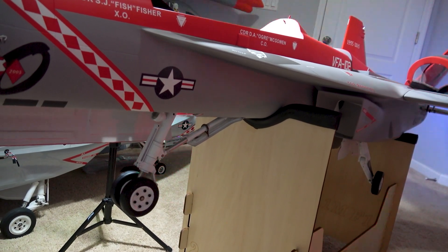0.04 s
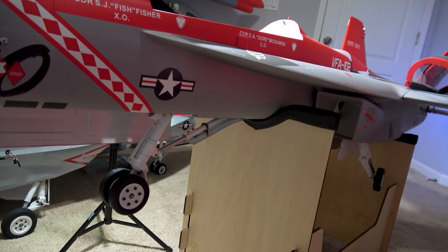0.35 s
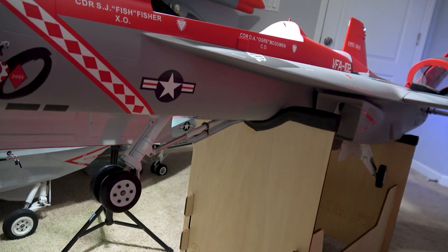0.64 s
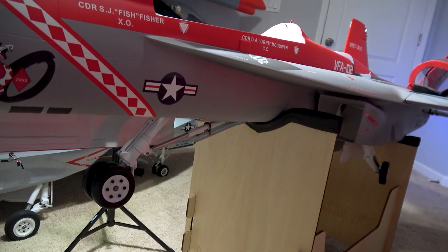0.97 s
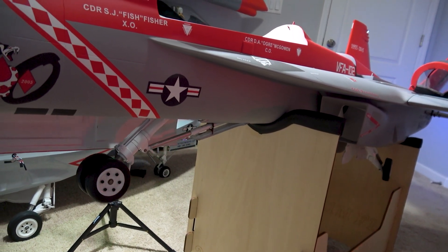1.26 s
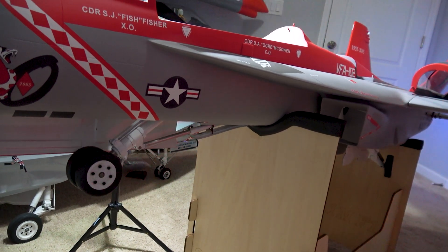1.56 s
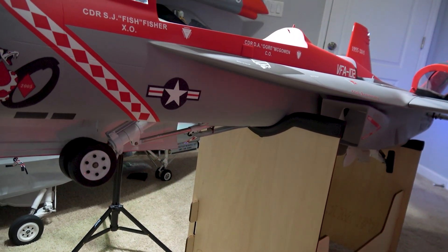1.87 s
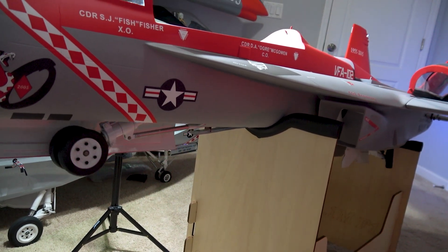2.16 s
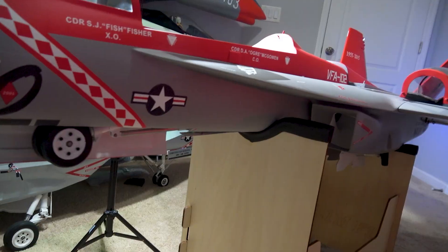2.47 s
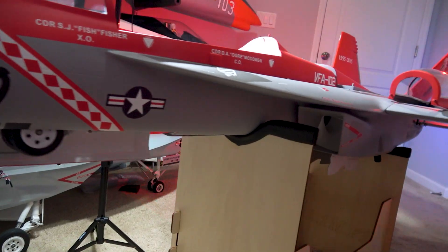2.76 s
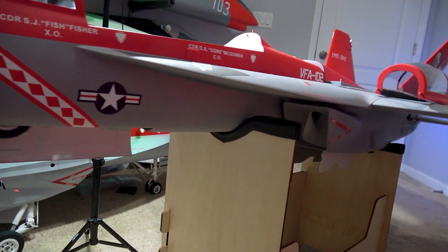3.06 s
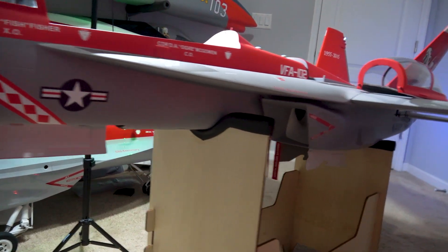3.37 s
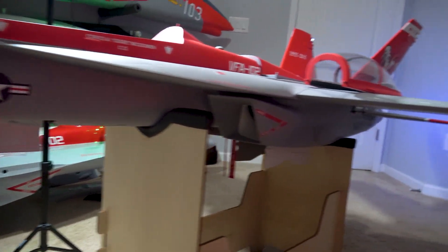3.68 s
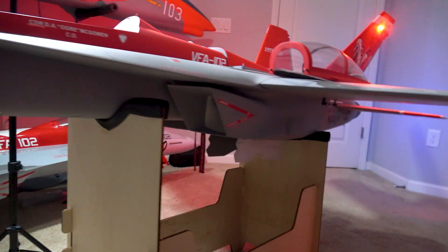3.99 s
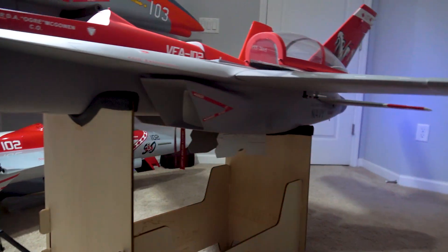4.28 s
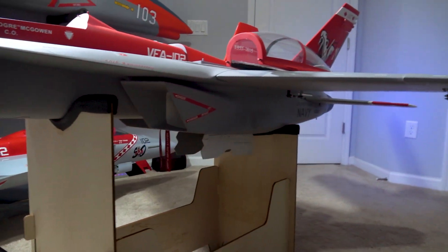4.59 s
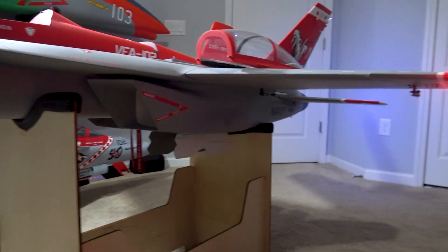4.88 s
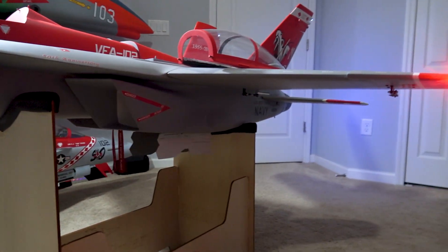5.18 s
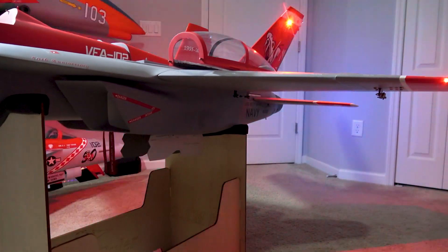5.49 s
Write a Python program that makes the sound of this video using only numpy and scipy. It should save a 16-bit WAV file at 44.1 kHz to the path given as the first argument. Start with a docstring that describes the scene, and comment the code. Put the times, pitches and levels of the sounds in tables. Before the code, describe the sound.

Small electric motors whine and rattle as a model jet's landing gear folds up, stopping abruptly before the doors shut with two light clacks.

```python
"""A rattling, geared whine: three electric retracts fold a large model jet's landing gear.
In the small carpeted room their motors run at nearly the same speed, brushes buzzing, and loose
teeth shake the hollow airframe. Each motor sags and squeals under load, then stalls at its end stop.
Last, small servos pull the gear doors shut with two light clacks."""
import sys
import numpy as np
from scipy import signal
from scipy.fft import rfft, irfft, next_fast_len
from scipy.io import wavfile

SR = 44100
rng = np.random.default_rng(int(sys.argv[2]) if len(sys.argv) > 2 else 0)


def dump(signal):
    """Clip the signal to [-1, 1] and save it as 16-bit WAV at the path in sys.argv[1]."""
    limited = np.clip(np.atleast_2d(signal).T, -1, 1)
    pcm = np.round(limited * 32767).astype(np.int16)
    wavfile.write(sys.argv[1], SR, pcm)


N = 244225
TIME = np.arange(N) / SR
PINION_TEETH = 6
IDLER_RATIO = .787  # idler turns per shaft turn
SCREW_REDUCTION, STAGE_REDUCTION = 47, 7.55  # shaft turns per turn of each slow gear
FULL_LOAD_SAG = .048  # share of its starting speed a motor has lost at full load
SING_HZ, RING_HZ = 3100, 3603
ROOM_T60_S = .32

# each motor's run, ending where it stalls (time [s], shaft speed [turns/s])
NEAR_SPEED = [(0, 353), (.6, 355), (1.2, 354.5), (1.7, 352), (2.15, 351.5), (2.45, 349.5), (2.7, 343.5),
              (3.0, 346), (3.2, 347.5), (3.55, 352.5), (3.87, 354.5), (3.96, 343), (4.04, 336), (4.07, 305)]
FAR_SPEED = [(0, 349.5), (.6, 349), (1.2, 347.5), (1.7, 346), (2.2, 343), (2.5, 337), (2.75, 333),
             (3.0, 338), (3.3, 342), (3.5, 350), (3.85, 354), (3.94, 322), (3.98, 317), (4.01, 323),
             (4.05, 317), (4.075, 299), (4.16, 293)]
NOSE_SPEED = [(0, 351), (.5, 354), (1.1, 358), (1.6, 355), (2.0, 351), (2.4, 349), (2.55, 341),
              (2.585, 335), (2.6, 311), (2.617, 290), (2.64, 307), (2.655, 285), (2.68, 298)]
# each motor's voice (pitch [x shaft speed], level [dB])
NEAR_TONES = [(1, -42), (4, -51.5), (5, -65), (7, -62)]
FAR_TONES = [(1, -49.5), (1.6, -49.5), (3, -43), (10.35, -47)]
NOSE_TONES = [(3, -55.5), (4, -45), (6, -46.5), (9, -57)]
# pinion mesh tone, building as the legs lift (time [s], level [dB])
MESH_LEVEL = [(0, -54), (.25, -41.5), (1.4, -37), (1.85, -43), (2.25, -38.5), (2.65, -36), (2.8, -31.5),
              (3.55, -32), (3.8, -31.5), (4.05, -32), (4.09, -34), (4.16, -35)]
# resonances of the gearbox housing and hollow airframe (frequency [Hz], width [Hz], lift [dB])
GEARBOX_RESONANCES = [(1037, 22, 3.5), (1400, 13, 5.5), (1754, 59, 1), (2030, 100, 3.5), (2390, 80, 2),
                      (2664, 160, -2.5), (2840, 46, 2.5), (3084, 82, 1), (3603, 14, -2.5)]
AIRFRAME_RESONANCES = [(129, 12, 14), (196, 16, 9.5), (310, 22, -4.5), (350, 12, 6), (397.6, 20, 10.5),
                       (446, 8.4, 7.5), (586, 130, 3.5)]
# gear clatter, airframe boom, tooth-edge ticks and sliding hiss (frequency [Hz], gain [dB])
GEAR_EQ = [(60, -36), (300, -30), (600, 3), (800, 3), (1000, 2), (1200, -1), (1550, -2.5), (1900, -0.5),
           (2350, -1), (2650, -4.5), (3200, 0), (3800, 4.5), (4500, 0.5), (6500, -24.5), (14000, -51.5)]
BOOM_EQ = [(30, -27.5), (85, -29), (150, -17.5), (215, -2.5), (305, 3), (370, -2), (440, -1), (530, -0.5),
           (700, -9), (1200, -15), (5000, -79.5)]
EDGE_EQ = [(600, -41.5), (2500, -20), (3600, 7), (4600, 4.5), (6000, 3.5), (7200, -13), (8500, -9),
           (10000, -14), (15000, -16.5)]
HISS_EQ = [(3000, -18), (6000, 2), (7400, 1), (8600, -0.5), (10000, -3), (13000, -9), (15500, -16.5)]
# the hum swells as the screws turn (time [s], half length [s], level [dB])
HUM_SURGES = [(.039, 0.03, -31.5), (.123, 0.018, -34.5), (.24, 0.018, -30.5), (.345, 0.022, -35),
              (.468, 0.033, -35), (.615, 0.016, -34), (.69, 0.012, -36), (.772, 0.016, -32),
              (.825, 0.02, -33), (.9, 0.018, -32), (1.018, 0.019, -30.5), (1.068, 0.013, -30),
              (1.175, 0.029, -34), (1.285, 0.032, -34), (1.41, 0.035, -32.5), (1.527, 0.047, -33.5),
              (1.658, 0.035, -36), (1.825, 0.04, -34.5), (1.925, 0.025, -37.5), (2.093, 0.033, -34.5),
              (2.235, 0.03, -31), (2.38, 0.04, -32.5), (2.53, 0.087, -37.5), (3.135, 0.039, -35),
              (3.245, .045, -37), (3.414, 0.047, -34), (3.63, 0.097, -39.5), (3.812, 0.052, -37),
              (3.945, 0.035, -42.5)]
# loaded teeth squeal (time [s], half length [s], level [dB], mesh harmonic, motor [0 near 1 far 2 nose])
SQUEALS = [(1.71, .05, -42, 2, 0), (2.15, .27, -43.5, 2, 0), (2.615, .014, -38, 3, 2),
           (2.637, .02, -30.5, 2, 2), (2.671, .009, -35, 3, 2), (2.763, .014, -32, 2, 1),
           (2.768, .02, -39, 3, 1), (2.87, .05, -37, 2, 1), (2.93, .14, -42.5, 3, 1),
           (3.055, .025, -36, 2, 0), (3.29, .022, -33, 1, 1), (3.6, .2, -42, 2, 0),
           (3.695, .012, -27, 1, 0), (3.822, .011, -20.5, 1, 0), (3.86, .03, -39, 2, 0),
           (3.872, .011, -28.5, 1, 0), (3.96, .022, -41, 2, 1), (3.985, .035, -44, 3, 1),
           (3.982, .008, -29, 1, 0), (4.035, .016, -35, 1, 0), (4.04, .018, -41, 2, 1),
           (4.08, .022, -45, 3, 1), (4.1, .022, -42, 2, 1)]
# scrapes at the end stops (time [s], half length [s], level [dB], motor [0 near 1 far 2 nose])
END_STOPS = [(2.64, .035, -37.5, 2), (4.042, .016, -33.5, 1)]
# the gearbox's singing, fading as the legs fold in (time [s], level [dB])
SING_LEVEL = [(0, -52), (.2, -39), (.6, -42.5), (.9, -40.5), (1.6, -41), (2.4, -48), (4.0, -55)]
# flares of the housing's top resonance (time [s], half length [s], level [dB])
HOUSING_RINGS = [(.06, .05, -44), (.55, .25, -49), (.84, .03, -43), (1.0, .05, -40), (1.26, .04, -38.5)]
# booms from lurching legs (time [s], half length [s], level [dB], resonance [Hz])
LURCHES = [(0.208, 0.017, -37.5, 196), (0.282, 0.02, -33, 578), (0.658, .014, -41, 570),
           (0.724, 0.0091, -36, 566), (0.76, 0.25, -54.5, 129), (1.747, 0.11, -53.5, 129),
           (0.823, 0.016, -31.5, 350), (2.122, 0.03, -33, 350), (2.478, 0.021, -32.5, 396.4),
           (2.656, 0.045, -46, 129), (2.678, 0.047, -34.5, 412), (2.98, 0.056, -33, 397),
           (3.954, 0.033, -30.5, 352.6)]
# side tones of a strained drive (pitch [x shaft speed], level [dB])
STRAIN_TONES = [(5, -49), (10, -48), (11.15, -45), (14, -47.5)]
# strain as the legs pass into the wells (time [s], half length [s], gain [dB])
STRAIN_SWELLS = [(3.03, 0.36, -0.5), (3.5, 0.45, -13)]
# brush buzz on the commutator (pitch [x shaft speed], level [dB])
BRUSH_TONES = [(5, -53), (10.65, -55), (11.15, -55), (13, -58), (17, -58)]
# spells of brush sizzle (time [s], half length [s], level [dB], pitch [x shaft speed])
SIZZLES = [(.19, .02, -47, 17), (.48, .018, -47, 17), (.4, .22, -56, 19.8), (.7, .12, -55, 23.4),
           (.95, .15, -58, 31.4), (1.55, .3, -56, 24), (1.4, .6, -58, 25), (2.3, .25, -57, 23.5),
           (3.6, .17, -54, 24.2), (3.62, .17, -55, 25), (3.57, .15, -53, 17.9)]
# last whirr of the gears (time [s], half length [s], level [dB])
COAST_SWELL = (4.185, .05, -50)
# timbre of that whirr (frequency [Hz], gain [dB])
COAST_EQ = [(1500, -28), (3000, -12), (3700, 2), (4900, 2), (6000, -23), (10000, -38)]
# door hits (time [s], crack level [dB], decay [s], thud level [dB], low-pass [Hz], panel tone [Hz])
DOOR_HITS = [(4.692, -43, 0.006, -70, 10000, 2040), (4.711, -41, 0.0067, -62, 13000, 1700),
             (4.716, -45, 0.0064, -58, 2500, 1300), (4.726, -45, .006, -42, 2500, 600),
             (4.797, -45, .003, -68, 7500, 1700), (4.799, -44.5, 0.0058, -64, 4270, 1350),
             (4.811, -45.5, 0.0085, -68, 4900, 1500)]
# timbre of a door's crack (frequency [Hz], gain [dB])
CRACK_EQ = [(60, -16), (130, -9), (300, 3), (900, -3), (1600, -3.5), (2300, -7), (2900, -8.5), (4600, -5.5),
            (7000, -10), (14000, -27)]
# fuselage modes struck by a door (frequency [Hz], level [dB], T60 [s])
FUSELAGE_MODES = [(137, -6.5, 0.15), (350, -7, 0.63), (497, -9, .15)]
# door servos moving and holding (time [s], half length [s], level [dB])
SERVO_MOVES = [(4.26, 0.055, -57), (4.5, 0.14, -61), (4.82, 0.095, -69), (5.27, 0.07, -58)]
SERVO_HOLDS = [(4.34, 0.12, -77), (4.68, 0.057, -79), (5.43, 0.085, -78)]
# their moving hum and holding whistle (frequency [Hz], gain [dB])
SERVO_EQ = [(120, -46), (200, 6), (275, 11.5), (360, -6), (700, -5.5), (1500, -15), (4500, -27),
            (9000, -35)]
WHISTLE_EQ = [(6500, -24), (7100, 1), (7350, 4), (7550, -10.5), (8200, -31.5)]
# one servo runs up and down (time [s], fundamental [Hz], level [dB])
SERVO_GLIDE = [(4.37, 794, -110), (4.41, 875, -81), (4.45, 947, -74), (4.49, 880, -80), (4.53, 830, -110)]
# room tone (frequency [Hz], gain [dB])
ROOM_TONE_EQ = [(15, -27.5), (25, 8.5), (53, 9), (144, -1.5), (297, 5.5), (457, -3.5), (722, 0), (848, -1),
                (1080, -14), (1270, -3), (2060, -25), (2230, -15), (3000, -20.5), (7500, -20), (15500, -25)]
# brightness as the listener moves aft, past the wells and behind the fuselage (time [s], gain [dB])
TREBLE_RIDE = [(2.55, 1), (2.85, 1.5), (3.2, 3), (3.7, 0), (3.95, -1.5)]
# stereo width (frequency [Hz], side minus mid [dB])
WIDTH_EQ = [(40, -34), (120, -16.5), (300, -24.5), (1000, -24.5), (2100, -39), (4000, -28.5), (6000, -11),
            (8500, 0), (15000, 9)]
# stereo balance (frequency [Hz], left minus right [dB])
BALANCE_EQ = [(30, 1), (100, -4.5), (270, 1.5), (600, -2), (1200, -2), (2200, 0.2), (4200, 1),
              (12000, -0.5)]
# bands of the mesh tone and the hum (low edge [Hz], high edge [Hz])
PAN_BANDS = [(1750, 2450), (210, 470)]
# their drift as the listener moves (time [s], mesh left minus right [dB], hum left minus right [dB])
PAN_RIDE = [(0.0, -2.5, -0.5), (1.3, -2.5, 0.5), (1.51, -0.5, 2), (1.71, 0.5, -0.5), (2.05, 2.5, -0.5),
            (2.32, 0.5, 3.5), (2.63, -4, 0), (2.72, -1.5, -5), (3.01, -5.5, -5), (3.87, 5.5, 7),
            (4.01, 2.5, 1), (4.07, 2.5, 4), (4.2, -2, 5)]


def motor_whine(near, far, nose):
    """Three shafts whine through the housing; the near and far pinions add the tones of meshing teeth."""
    whine = 0
    motors = (near, NEAR_SPEED, NEAR_TONES), (far, FAR_SPEED, FAR_TONES), (nose, NOSE_SPEED, NOSE_TONES)
    for angle, speed, tones in motors:
        strength = (automation(speed)[0] / speed[0][1]) ** 7  # drops fast as the motor slows
        whine += strength * running(speed) * tone_stack(angle, tones, rough=.58)
    whine = equalise(whine, [(20, 0), (20000, 0)], GEARBOX_RESONANCES)
    whine *= from_db(np.interp(TIME, [1.6, 2.9, 4.0], [-.5, -2, -4.5]))  # legs recede into the fuselage
    mesh_db, treble_db = automation(MESH_LEVEL)[0], automation(TREBLE_RIDE)[0]
    near_stalled = 1 - running(NEAR_SPEED)
    for angle, speed, trim_db in ((near, NEAR_SPEED, -2.2), (far, FAR_SPEED, -4.4)):
        effort = load(speed)
        # play between the teeth blurs the mesh, more so under load
        mesh = PINION_TEETH * angle + (.09 + .19 * effort + .55 * near_stalled) * drift(180)
        wobble = 1 + .26 * np.cos(angle)  # off-centre pinion
        first = from_db(mesh_db) * tone(mesh, rough=.42 + .2 * effort)
        second = from_db(-43 + 7.5 * effort + 1.5 * treble_db) * tone(2 * mesh, rough=.42)
        third = from_db(-63 + 15 * effort + 1.2 * treble_db) * tone(3 * mesh, rough=.4)
        fourth = from_db(-57.5) * tone(4 * mesh, rough=.98)
        gain = running(speed) * stall_duck() * wobble * from_db(trim_db)
        whine += gain * (first + second + third + fourth)
    # the last motor judders on alone into its stop
    judder = tone(PINION_TEETH * far + 1.2 * drift(150), rough=.88)
    alone = running(FAR_SPEED, fade_s=.016) * near_stalled
    return whine + room(alone * from_db(-47) * judder, wet_db=-6)


def backlash_rattle(near, far):
    """Backlash knocks throb with the slow gears and ring in gearbox and airframe; sliding teeth hiss."""
    load_db = (load(NEAR_SPEED) + load(FAR_SPEED)) / 2  # 1 dB up at full load
    treble_db = automation(TREBLE_RIDE)[0]
    throb_db = .23 * np.sin(near / SCREW_REDUCTION) + .27 * np.sin(near / STAGE_REDUCTION) + drift(37)
    knocks = (tooth_knocks(near, spread_db=2.5) + tooth_knocks(far, spread_db=2)) * from_db(throb_db)
    gears = rms_one(equalise(knocks, GEAR_EQ, GEARBOX_RESONANCES))
    gears *= from_db(-31 + load_db + .93 * treble_db)
    boom = from_db(-34.5 + load_db) * rms_one(equalise(knocks, BOOM_EQ, AIRFRAME_RESONANCES))
    edge = from_db(-37.5 + load_db + treble_db) * rms_one(equalise(knocks, EDGE_EQ))
    hiss = from_db(-42.5) * noise(HISS_EQ) * until(4.044, fade_s=.08)
    shaking = stall_duck() * until(4.105, fade_s=.045)  # the shell rings on briefly
    return room((gears + edge) * shaking + hiss, wet_db=-9) + room(boom * shaking, wet_db=-14)


def tooth_knocks(angle, spread_db, per_s=1400):
    """Loose teeth knock at random, mostly on one side of each turn."""
    hits = rng.random(N) < per_s * (1 + .8 * np.cos(angle)) / SR
    return hits * rng.choice([-1, 1], N) * from_db(spread_db * np.minimum(rng.exponential(1, N), 3.3))


def idler_hum(near, far):
    """Idler gears drive the fuselage skin like a drumhead: a low, surging hum."""
    skin = tone(IDLER_RATIO * (near + far) / 2, rough=.12)
    strength = from_db(-45.5 + 4.5 * load(FAR_SPEED) ** 2) + swells(HUM_SURGES)
    return running(FAR_SPEED) * stall_duck() * strength * skin


def tooth_squeals(angles):
    """Loaded teeth stick and slip in raspy squeals, and scrape at the end stops."""
    squeal, scrape = 0, 0
    for motor, angle in enumerate(angles):
        mesh = PINION_TEETH * angle + .27 * drift(220) + .4 * drift(30)
        for k in (1, 2, 3):
            cues = [row[:3] for row in SQUEALS if row[3:] == (k, motor)]
            squeal += swells(cues) * tone(k * mesh, rough=.13 * k)
    for *cue, motor in END_STOPS:
        slip = 3 * PINION_TEETH * angles[motor] + 1.45 * drift(280)
        scrape += swells([cue]) * tone(slip, rough=.3)
    return room(squeal, wet_db=-12) + room(scrape, wet_db=-8)


def housing_song():
    """The gearbox sings, lifting with each surge of the hum; its top resonance rings now and then."""
    throb = 1 + .26 * (rms_one(swells(HUM_SURGES)) - 1)
    strength = from_db(automation(SING_LEVEL)[0]) * throb * running(NEAR_SPEED)
    sing = strength * tone(2 * np.pi * SING_HZ * TIME + .8 * drift(25), rough=.5)
    return sing + swells(HOUSING_RINGS) * tone(2 * np.pi * RING_HZ * TIME, rough=.3)


def leg_lurches():
    """Each lurch of a leg sets one airframe resonance booming."""
    return sum(swells([cue]) * tone(2 * np.pi * hz * TIME, rough=.25) for *cue, hz in LURCHES)


def gear_strain(far):
    """Gears flex under load and add side tones round the whine."""
    return swells(STRAIN_SWELLS) * running(NEAR_SPEED) * tone_stack(far, STRAIN_TONES, rough=.3)


def brush_buzz(near):
    """Brushes buzz on high multiples of the shaft speed and sizzle in spells."""
    buzz = tone_stack(near, BRUSH_TONES, rough=.4) * (1 - load(NEAR_SPEED) / 2)
    chatter = .8 * drift(120)
    sizzle = sum(swells([cue]) * np.sqrt(2) * np.sin(k * near + chatter) for *cue, k in SIZZLES)
    return (buzz + sizzle) * running(NEAR_SPEED)


def coasting_gears():
    """A short, bright whirr as the gears coast to rest."""
    return room(swells([COAST_SWELL]) * noise(COAST_EQ), wet_db=-17)


def door_clacks(panel_width_hz=800, panel_lift_db=10):
    """Each door hit cracks, coloured by the panel it meets, and sets the fuselage ringing."""
    cracks, thuds = np.zeros(N), np.zeros(N)
    for s, crack_db, decay_s, thud_db, cutoff_hz, panel_hz in DOOR_HITS:
        soften = signal.butter(4, cutoff_hz, fs=SR, output="sos")
        grain = noise(CRACK_EQ, [(panel_hz, panel_width_hz, panel_lift_db)])
        envelope = from_db(crack_db) * (TIME >= s) * until(s, decay_s)
        cracks += signal.sosfilt(soften, envelope * grain + 1e-18)
        thuds[round(s * SR)] = from_db(thud_db)
    t = TIME[:SR // 2]
    ring = sum(from_db(db - 60 * t / t60) * np.sin(2 * np.pi * hz * t) for hz, db, t60 in FUSELAGE_MODES)
    return room(cracks, wet_db=-4) + signal.fftconvolve(thuds, ring)[:N]


def door_servos():
    """Servos hum as they move and whistle thinly as they hold; one glides up and down."""
    pitch, glide_db = automation(SERVO_GLIDE)
    angle = 2 * np.pi * np.cumsum(pitch) / SR
    glide = from_db(glide_db) * sum(tone(k * angle + 1.5 * drift(200), rough=.6) for k in (10, 13, 14))
    hum = swells(SERVO_MOVES) * noise(SERVO_EQ)
    whistle = swells(SERVO_HOLDS) * noise(WHISTLE_EQ)
    return room(hum + whistle + glide, wet_db=-10.5)


def room_tone():
    """A faint, dark bed of noise."""
    return from_db(-59.5) * noise(ROOM_TONE_EQ)


def room(x, wet_db):
    """Equal-power blend of direct sound and dense reflections whose treble dies sooner."""
    t = TIME[:SR // 2]
    white = rng.standard_normal(len(t)) * (t > .003)
    dull = signal.sosfilt(signal.butter(2, 5500, fs=SR, output="sos"), white)
    tail = dull * from_db(-60 * t / ROOM_T60_S) + .26 * white * from_db(-60 * t / .24)
    tail = rms_one(tail) / np.sqrt(len(t))
    wet = from_db(wet_db)
    return (x + wet * signal.fftconvolve(x, tail)[:N]) / np.sqrt(1 + wet ** 2)


def shaft_angle(speed, wander=.0022, flutter=.0035):
    """Angle of a motor shaft whose speed wavers with the friction in its gears."""
    turns_per_s = automation(speed)[0] * (1 + wander * drift(7) + flutter * drift(70))
    return 2 * np.pi * np.cumsum(turns_per_s) / SR


def load(speed):
    """Motor load, 0 to 1, from how far its speed has sagged."""
    return np.clip((1 - automation(speed)[0] / speed[0][1]) / FULL_LOAD_SAG, 0, 1)


def running(speed, fade_s=.0063):
    """A gate that closes when the motor stalls."""
    return until(speed[-1][0], fade_s)


def stall_duck(duck_db=-3):
    """The shaking drops as the near motor stops."""
    near_on = until(NEAR_SPEED[-1][0] - .015, fade_s=.002)
    return near_on + (1 - near_on) * from_db(duck_db)


def tone(angle, rough):
    """A gear tone; uneven tooth contact spreads a noisy skirt round its pitch."""
    wavering = (1 + rough * drift(61)) * np.sin(angle) + rough * drift(35) * np.cos(angle)
    return np.sqrt(2 / (1 + 2 * rough ** 2)) * wavering


def tone_stack(angle, tones, rough):
    """Gear tones at multiples of one shaft's speed."""
    return sum(from_db(db) * tone(k * angle, rough) for k, db in tones)


def swells(cues):
    """A rounded, flat-topped envelope centred on each cue."""
    return sum(from_db(db) / (1 + ((TIME - s) / half_s) ** 6) for s, half_s, db in cues)


def until(end_s, fade_s):
    """Full level until end_s, then an exponential tail."""
    return np.exp(-np.maximum(TIME - end_s, 0) / fade_s)


def automation(rows):
    """One curve for each column after the time."""
    times, *columns = np.transpose(rows)
    return [np.interp(TIME, times, column) for column in columns]


def drift(rate_hz):
    """Smooth random modulation of unit power."""
    pole = np.exp(-40 * np.pi * rate_hz / SR)  # runs at SR / 20
    white = rng.standard_normal(N // 20 + 4002)
    slow = signal.lfilter([1], [1, -2 * pole, pole * pole], white)[4000:]
    return np.interp(np.arange(N) / 20, np.arange(len(slow)), rms_one(slow))


def noise(eq, resonances=()):
    """Coloured noise of unit power."""
    return rms_one(equalise(rng.standard_normal(N), eq, resonances))


def equalise(x, eq, resonances=()):
    """Minimum-phase EQ: a smooth curve plus narrow resonances."""
    size = next_fast_len(N + SR // 2, True)
    hz = np.arange(size // 2 + 1) * SR / size + 1
    eq_hz, eq_db = np.transpose(eq)
    db = np.interp(np.log(hz), np.log(eq_hz), eq_db)
    for centre, width, lift in resonances:
        db += lift / (1 + (2 * (hz - centre) / width) ** 2)
    cepstrum = irfft(np.log(from_db(db)), size)
    cepstrum[1:size // 2] *= 2
    cepstrum[size // 2 + 1:] = 0
    return irfft(rfft(x, size) * np.exp(rfft(cepstrum)), size)[:N]


def from_db(db):
    """Decibels to gain."""
    return 10 ** (np.asarray(db) / 20)


def rms_one(x):
    """Scale to unit power."""
    return x / np.sqrt(np.mean(x ** 2) + 1e-20)


def scene():
    """The jet is close and central; reflections add width, standing waves push tones from ear to ear."""
    near, far, nose = shaft_angle(NEAR_SPEED), shaft_angle(FAR_SPEED), shaft_angle(NOSE_SPEED)
    drives = room(motor_whine(near, far, nose), wet_db=-27.5)
    drives += housing_song() + brush_buzz(near) + gear_strain(far) + idler_hum(near, far)
    drives += leg_lurches() + tooth_squeals((near, far, nose)) + backlash_rattle(near, far)
    mid = drives + coasting_gears() + door_clacks() + door_servos() + room_tone()
    side = equalise(room(mid, wet_db=52.5), WIDTH_EQ)
    for band, pan_db in zip(PAN_BANDS, automation(PAN_RIDE)):
        ratio = from_db(pan_db)
        bandpass = signal.butter(2, band, "band", fs=SR, output="sos")
        side += (ratio - 1) / (ratio + 1) * signal.sosfiltfilt(bandpass, drives)
    return np.array([equalise(mid + sign * side, np.array(BALANCE_EQ) * [1, sign / 2])
                     for sign in (1, -1)])


def record(dry):
    """A steep low-pass trims the very top."""
    return signal.sosfilt(signal.ellip(10, .1, 80, 15650, fs=SR, output="sos"), dry)


dry = scene()
out = record(dry)
dump(out)
```